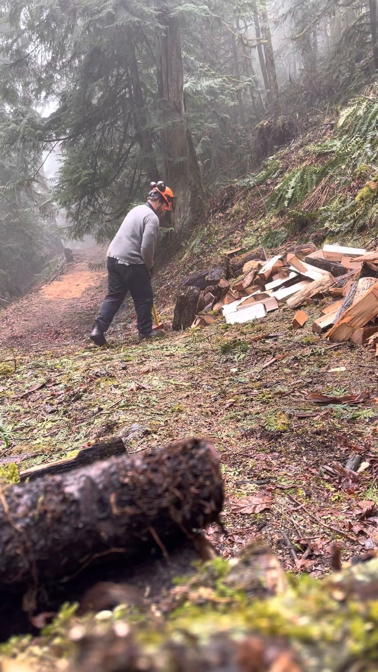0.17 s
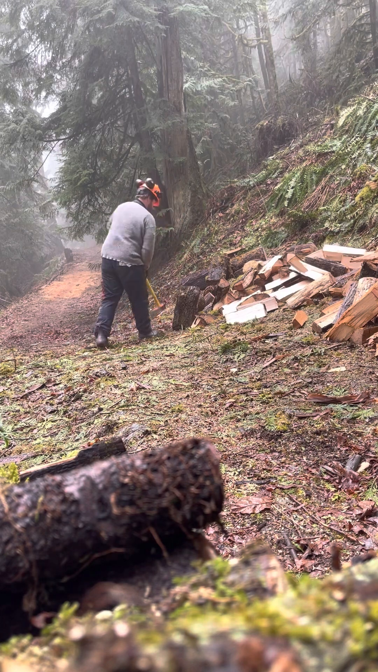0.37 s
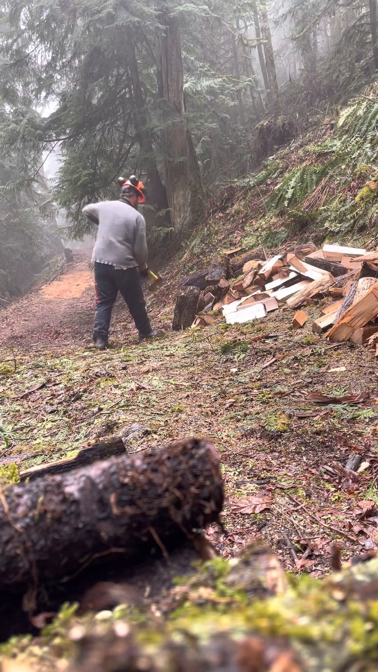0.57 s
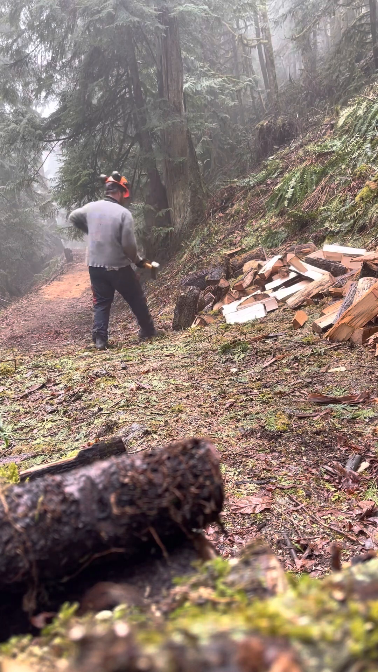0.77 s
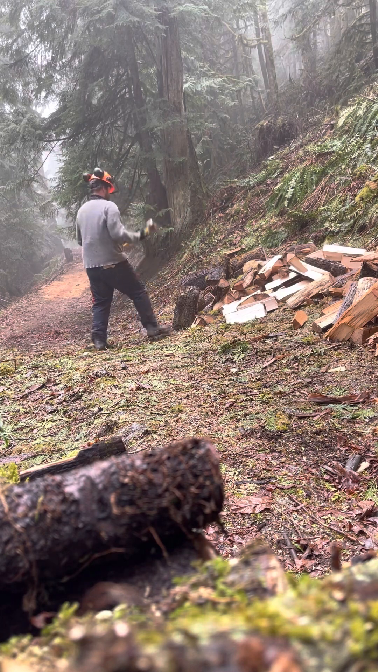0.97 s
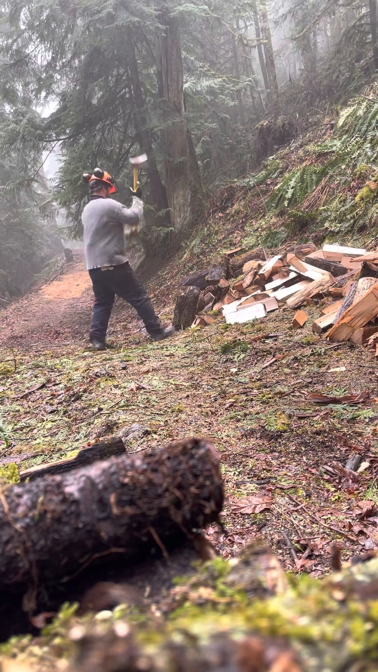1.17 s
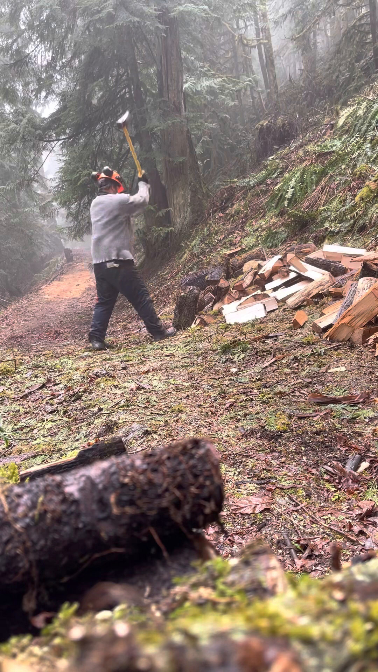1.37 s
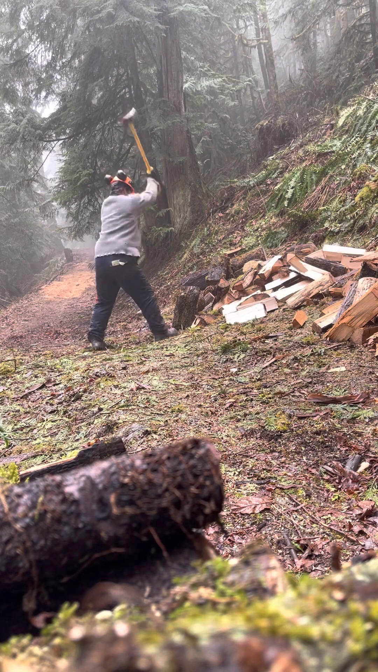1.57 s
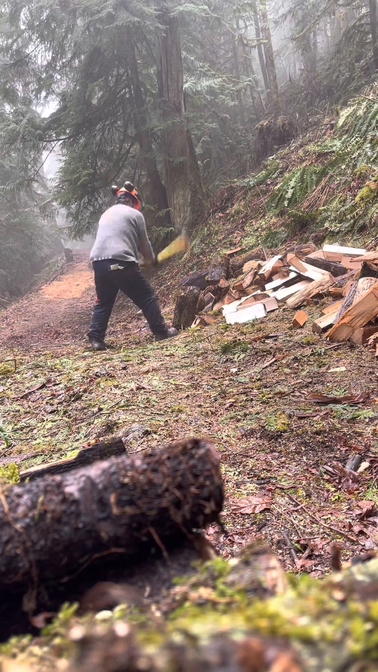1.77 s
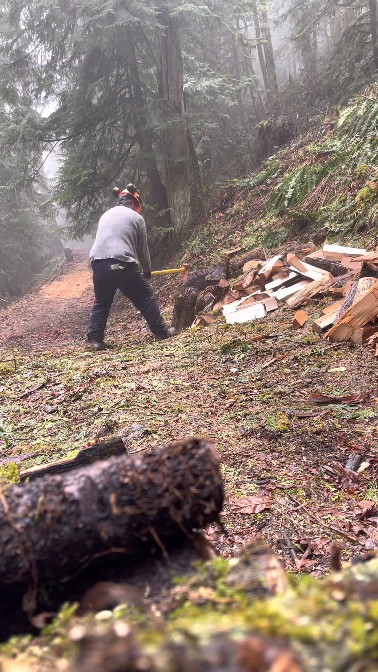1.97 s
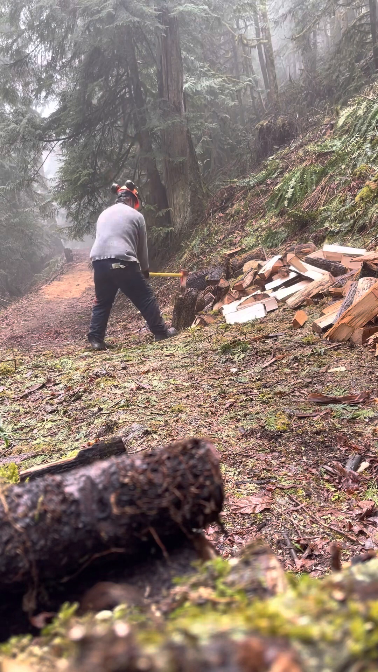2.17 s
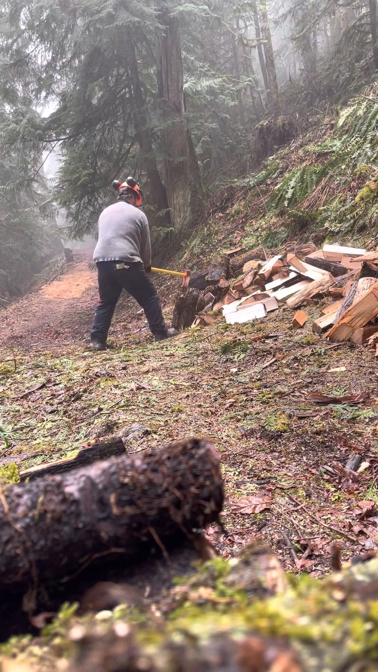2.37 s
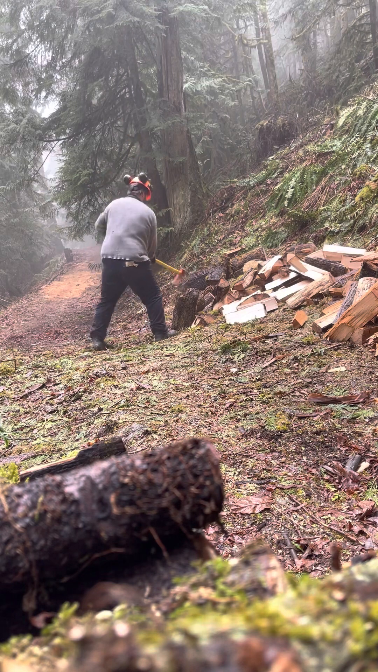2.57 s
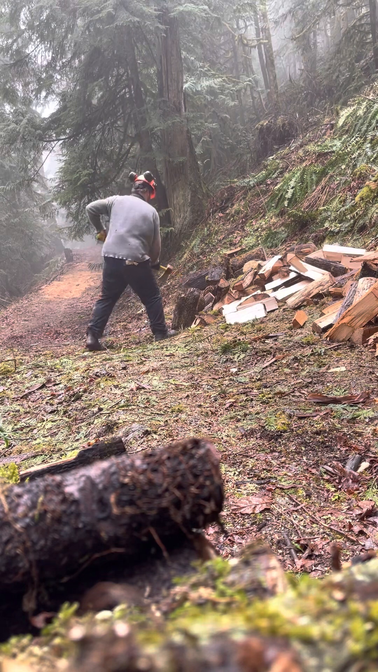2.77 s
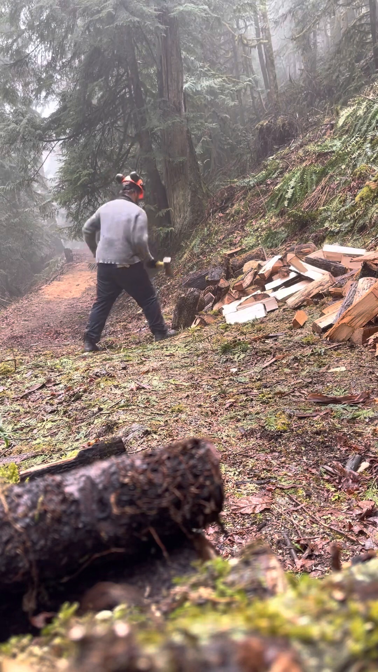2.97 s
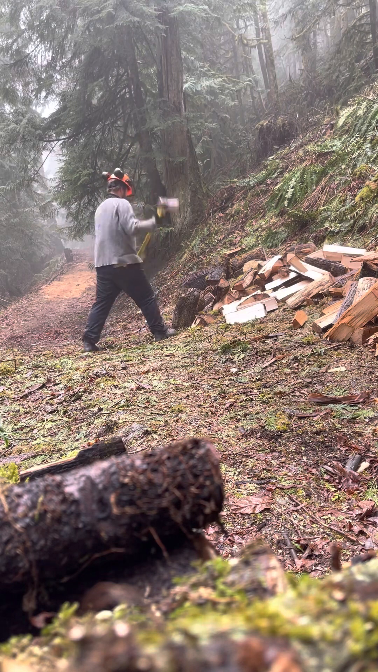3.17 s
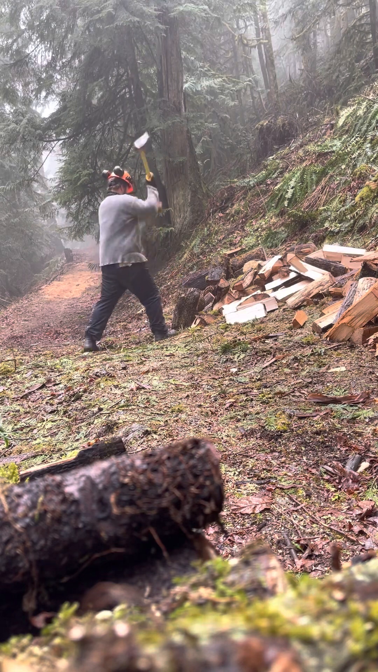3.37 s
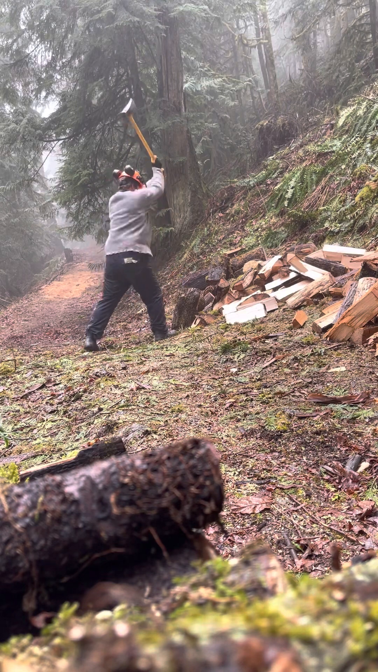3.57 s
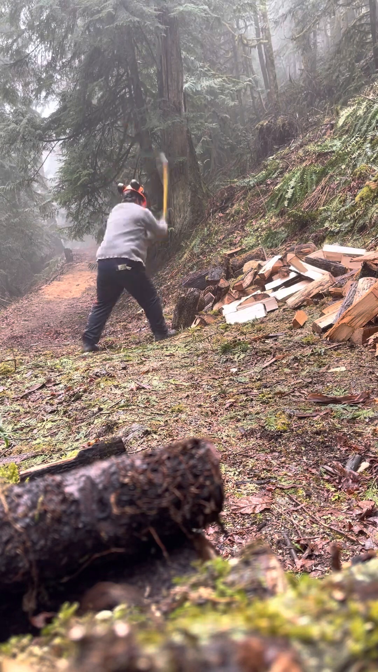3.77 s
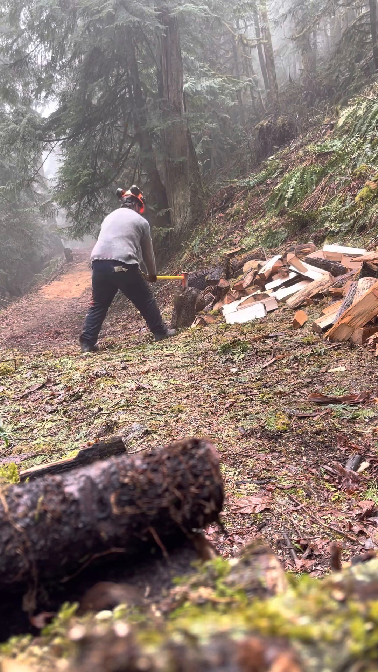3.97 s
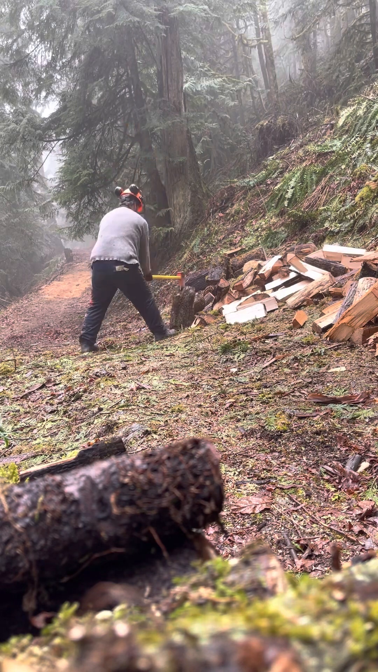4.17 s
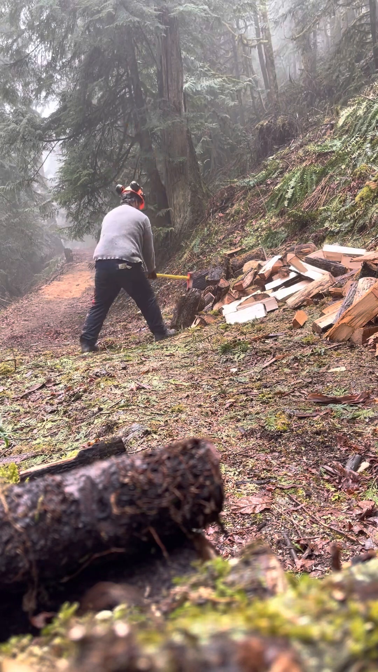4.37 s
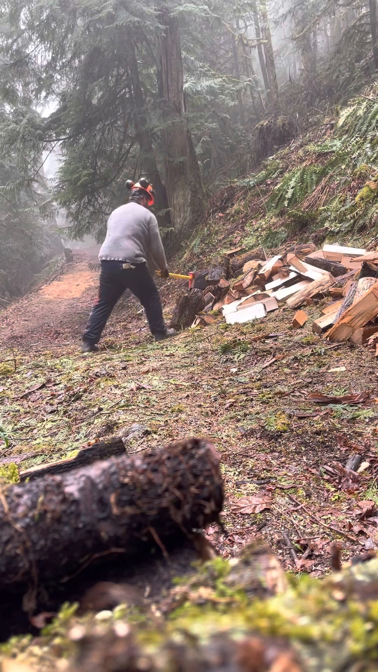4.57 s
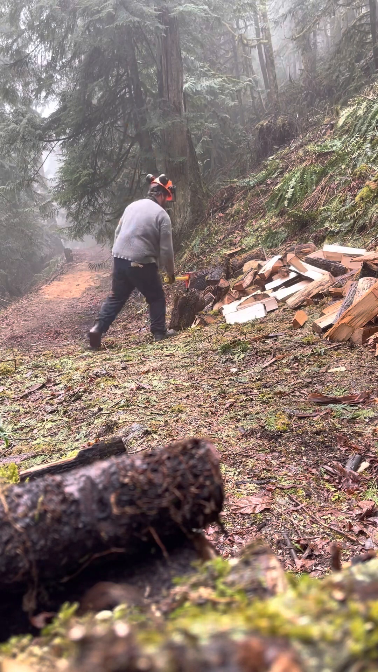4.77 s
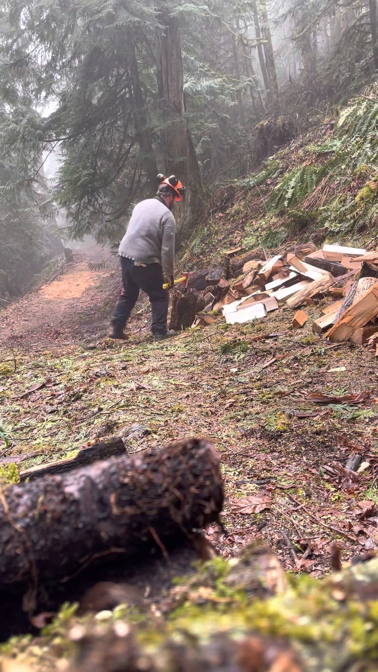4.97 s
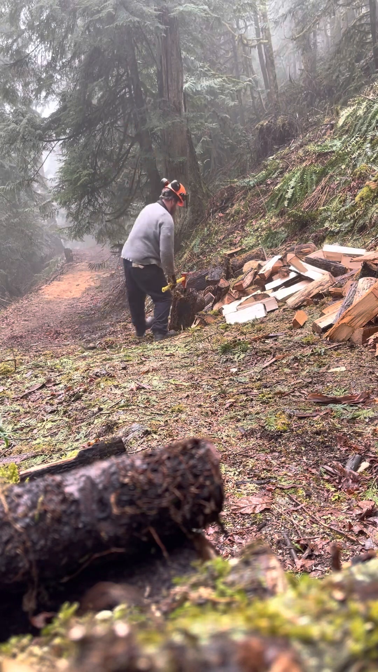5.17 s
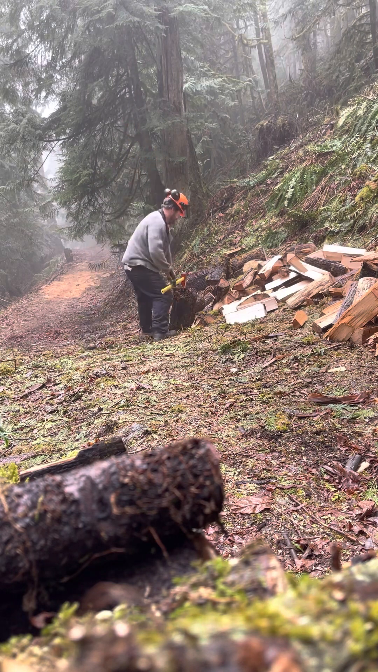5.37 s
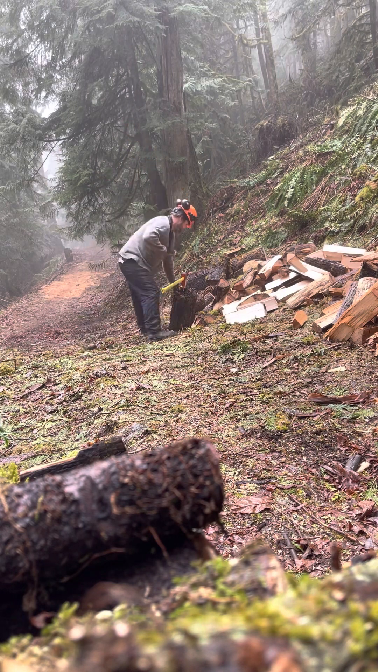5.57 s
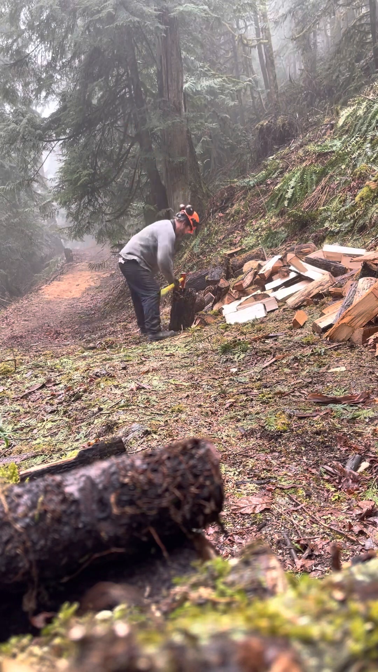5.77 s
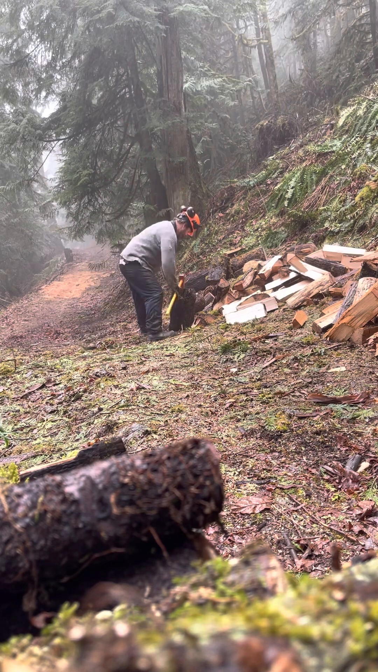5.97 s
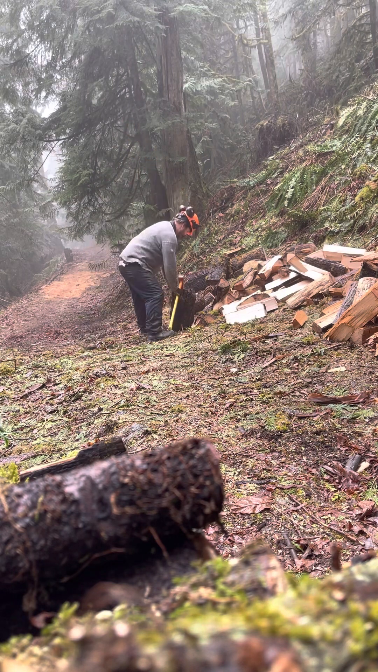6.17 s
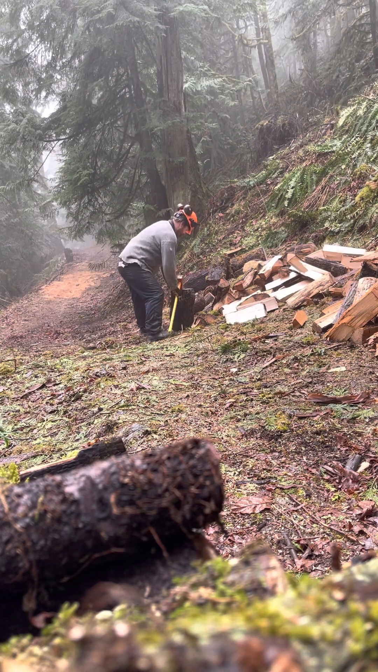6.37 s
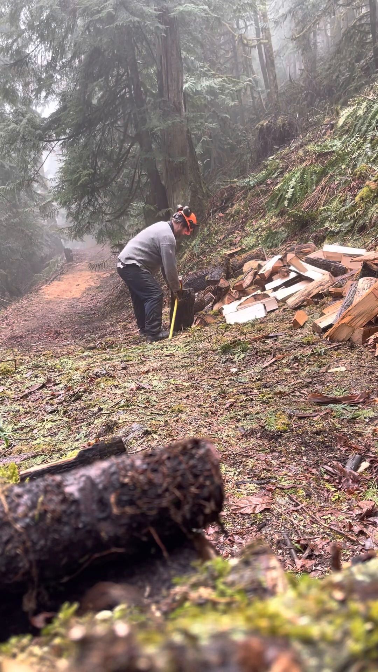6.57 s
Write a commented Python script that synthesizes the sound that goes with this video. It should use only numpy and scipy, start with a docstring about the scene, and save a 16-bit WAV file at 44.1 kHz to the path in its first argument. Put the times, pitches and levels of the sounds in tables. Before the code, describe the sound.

An axe splits wood outdoors with two sharp, booming strikes two seconds apart, each scattering woody echoes, followed by small clacks and scuffs.

```python
"""Two axe blows crack and thump into a round of firewood and scatter back from the trees.
The place is a still forest, with a pair of microphone ports on the ground some metres from the block.
Filtered noise makes the cracks, splinters, cloth and litter; damped sines make the ringing wood and thuds.
Sleeves swish as the axe is lifted, boots scuff the litter, and at the end the wood is knocked and shifted.
Random echo taps make the forest's answer, and a steady noise from all around makes the quiet air."""
import sys
import numpy as np
from scipy import signal
from scipy.fft import rfft, irfft
from scipy.io import wavfile
from scipy.ndimage import uniform_filter1d

SR = 44100
rng = np.random.default_rng(int(sys.argv[2]) if len(sys.argv) > 2 else 0)


def waveform_to_disk(signal):
    """Save audio, clipped to [-1, 1], as 16-bit WAV at the path in sys.argv[1]."""
    frames = np.transpose(np.atleast_2d(signal))
    scaled = np.clip(frames, -1, 1) * 32767
    samples = np.round(scaled).astype(np.int16)
    wavfile.write(sys.argv[1], SR, samples)


N = 292383
HZ = np.fft.rfftfreq(N, 1 / SR)
TIME = np.arange(N) / SR
SHORT = TIME[:16384]  # time axis of one short sound

# the axe blows and the forest's answer to each: start_s, ring_db, pitch_factor, boom_db, boom_t60_s,
# crack_db, tearing_fibres_db, forest_db, forest_treble_db
AXE_BLOWS = [(1.8382, -9, .95, -17, 0.078, -11, -28, -20.5, 1.5),
             (3.9287, -7.5, 1.02, -9.5, 0.079, -19.5, -39.5, -20, -11.5)]
# spectrum of small wood snapping, before any tilt: frequency_hz, relative_density_db_per_hz
SNAP_SPECTRUM = [(500, -6), (1500, 1), (3500, 1), (6000, -11.5), (8500, -8), (11000, -2), (12500, -9.5),
                 (14000, -49), (16000, -42)]


def amp(db):
    """Decibels to gain."""
    return 10 ** (np.asarray(db) / 20)


def evened(x):
    """Scales to rms 1."""
    return x / np.sqrt(np.mean(x ** 2) + 1e-20)


def read(points, hz):
    """Reads a table on a log-frequency axis."""
    f, value = np.transpose(points)
    return np.interp(np.log(hz + 1), np.log(f), value)


def add(mix, s, sound):
    """Mixes a sound in at time s."""
    part = mix[round(s * SR):][:len(sound)]
    part += sound[:len(part)]


def noise(spectrum, size, tilt_db=0):
    """Noise of rms 1 with a spectrum, tilted in dB per octave and rolled off under its lowest point."""
    hz = np.fft.rfftfreq(size, 1 / SR)
    octaves = np.log2(np.maximum(hz, 500) / 1000)  # the tilt stops below 500 Hz
    colour = amp(read(spectrum, hz) + tilt_db * octaves)
    lowest = spectrum[0][0]
    low_cut = hz ** 2 / (hz ** 2 + lowest ** 2 / 2)
    return evened(irfft(rfft(rng.standard_normal(size)) * colour * low_cut, size))


def decay(t60):
    """An exponential fade that loses 60 dB in t60 seconds."""
    return np.exp(-np.log(1000) * SHORT / t60)


def burst(spectrum, rise, t60, tilt_db=0):
    """A short spray of tiny fractures: noise that swells and dies (rise and t60 in s)."""
    fade = decay(t60) * (1 - np.exp(-SHORT / rise))
    return noise(spectrum, len(SHORT), tilt_db) * fade / fade.max()


def mode(hz, t60, swell):
    """A damped mode that swells over its first cycles."""
    cycles = SHORT * hz
    fade = decay(t60) * (1 - np.exp(-(cycles / swell) ** 2))
    return np.sin(2 * np.pi * cycles) * fade / fade.max()


def grain(size, depth_db):
    """The uneven grip of two surfaces rubbing, as a gain that changes every few milliseconds."""
    return amp(depth_db * evened(uniform_filter1d(rng.standard_normal(size), size=150)))


def axe():
    """The head rushes down, the edge bites, the round cracks, rings and booms, fibres tear and chips fly."""
    # modes of the round on its block, before each blow's pitch factor: frequency_hz, relative_level_db, t60_s
    round_modes = [(268.4, -12.5, .05), (339.7, -10, 0.042), (440, -10.5, 0.056), (608, -0.5, .036),
                   (740, -12.5, .045), (942, -7, 0.041), (1148, -16.5, 0.01), (1515, -16.5, .022)]
    # steel biting into wood, before any tilt: frequency_hz, relative_density_db_per_hz
    crack_spectrum = [(500, -7), (1650, -0.5), (2300, -12), (3000, -0.5), (3750, 4), (4700, -7.5),
                      (5400, -6), (6400, -15.5), (7700, -7), (8700, -9), (10700, 5.5), (12200, -8),
                      (13500, -27), (16000, -34)]
    # the split running on through the round in jerks: delay_after_blow_s, level_relative_to_crack_db
    split_jerks = [(.0042, -9), (.0167, -17)]
    # air around the falling head: frequency_hz, relative_density_db_per_hz
    rush_spectrum = [(120, -5.5), (450, -1), (700, -2), (1200, -18), (3000, -37)]
    swing_s, swing_db = .047, -55.5
    chip_flight_s = .07  # the first chips come down at least this long after a blow

    out = np.zeros(N)
    size = int(swing_s * SR)
    for s, ring_db, pitch, boom_db, boom_t60, crack_db, tear_db, _, _ in AXE_BLOWS:
        rush = noise(rush_spectrum, size) * np.linspace(0, 1, size) ** 2
        add(out, s - swing_s, amp(swing_db) * rush)
        # first bite through the surface
        bite = burst(crack_spectrum, rise=.001, t60=0.0092, tilt_db=3.5)
        add(out, s - .001, amp(crack_db - 14.5) * bite)
        crack = burst(crack_spectrum, rise=.0005, t60=.015, tilt_db=0.5)
        add(out, s + .001, amp(crack_db) * crack)
        for delay, db in split_jerks:
            jerk = burst(crack_spectrum, rise=.0003, t60=.018, tilt_db=2.0)
            add(out, s + delay, amp(crack_db + db) * jerk)
        tearing = burst(crack_spectrum, rise=0.0043, t60=.11, tilt_db=-1.0)
        add(out, s + .001, amp(tear_db - 4.0) * tearing)
        chips = splinters(per_s=110, t60=1.0, uneven_db=5)
        add(out, s + chip_flight_s, amp(tear_db - 26.5) * chips)
        add(out, s + 0.0007, amp(boom_db) * boom(boom_t60, start_hz=499, glide=0.0047, swell=0.0063))
        for hz, db, t60 in round_modes:
            add(out, s, amp(ring_db + db) * mode(hz * pitch, t60, swell=2.0))
    return out


def boom(t60, start_hz, glide, swell):
    """The soft ground holds back the low part of a blow, so it arrives as a falling boom (times in s)."""
    # the pitch falls as start_hz / (1 + t / glide)
    cycles = start_hz * glide * np.log(1 + SHORT / glide)
    fade = decay(t60) * (1 - np.exp(-(SHORT / swell) ** 2))
    return np.sin(2 * np.pi * cycles) * fade / fade.max()


def splinters(per_s, t60, uneven_db):
    """Chips fly off a split and patter down, most tiny, a few sharp, weaker as time goes on."""
    unevenness = np.minimum(rng.exponential(1, len(SHORT)), 3)
    sizes = amp(uneven_db * unevenness - 60 * SHORT / t60)
    chips = sizes * (rng.random(len(SHORT)) < per_s / SR)
    return signal.fftconvolve(chips, burst(SNAP_SPECTRUM, rise=.0002, t60=0.0087))


def knocks():
    """Wood knocks on wood: a spray of contact noise and the damped modes of a split billet."""
    # the knocks, each mode's pitch varying a little at random: start_s, level_db, pitch_factor
    knock_events = [(5.7660, -38.5, 1.02), (5.7700, -37.5, 0.93), (5.781, -37.5, 1.02), (6.1005, -58, 1.0),
                    (6.1165, -48, 0.94), (6.4276, -54.5, 0.59)]
    # modes of a split billet, before the pitch factor: frequency_hz, relative_level_db, t60_s
    billet_modes = [(407, -11, 0.058), (684, -3.5, 0.032), (930, -1, 0.066), (1467, 0, 0.03),
                    (1870, -4.5, 0.034), (2960, -6.5, 0.032)]
    out = np.zeros(N)
    for s, db, pitch in knock_events:
        contact = burst(SNAP_SPECTRUM, rise=0.00037, t60=0.0383, tilt_db=4.5)
        add(out, s, amp(db - 8.5) * contact)
        for hz, mode_db, t60 in billet_modes:
            ring = mode(hz * pitch * rng.uniform(0.93, 1.04), t60, swell=1.0)
            add(out, s, amp(db + mode_db - 3) * ring)
    return out


def snaps():
    """Splinters and twigs snap, each a very short burst of fractures."""
    # start_s, level_db, brightness_db_per_octave
    snap_events = [(.8541, -59.5, 9.5), (2.0024, -45, 0), (2.0713, -50, -2), (2.0913, -49.5, 12),
                   (2.1697, -58, -4), (2.5244, -59.5, -3.5), (4.2333, -61, 14), (4.6583, -62, 1.5),
                   (4.7285, -63.5, 5), (5.4705, -60, 10), (5.5108, -61.5, 4), (5.7907, -31.5, 5),
                   (6.1164, -44.5, 3)]
    out = np.zeros(N)
    for s, db, tilt_db in snap_events:
        add(out, s, amp(db) * burst(SNAP_SPECTRUM, rise=0.0005, t60=0.01382, tilt_db=tilt_db))
    return out


def landings():
    """Wood and boots land on soft ground: a slap, the full weight, then earth and litter settling. The row at
    1.857 s is not a landing but a deep thump under the first axe blow."""
    # start_s, level_db, pitch_hz of the full weight
    landing_events = [(.843, -56, 70.4), (1.857, -32.5, 54.5), (2.097, -35.5, 200), (3.975, -28, 192),
                      (4.018, -43, 83), (4.105, -47.5, 120), (4.232, -52, 130), (5.268, -50, 135),
                      (5.32, -54, 69), (5.772, -45, 171), (5.799, -39.5, 119.6), (5.831, -43, 151)]
    # earth and litter settling under a weight: frequency_hz, relative_density_db_per_hz
    soil_spectrum = [(45, -3), (110, 0), (300, -4), (600, -16), (1500, -40), (4000, -70)]
    soil_db, soil_t60 = -13, .17  # level relative to the thud; seconds
    # first contact: higher, weaker and just ahead (s) of the full weight
    slap_ratio, slap_db, slap_lead_s = 2.1, -4, .004
    out = np.zeros(N)
    for s, db, hz in landing_events:
        add(out, s - slap_lead_s, amp(db + slap_db) * thud(hz * slap_ratio))
        add(out, s, amp(db) * thud(hz))
        add(out, s, amp(db + soil_db) * burst(soil_spectrum, rise=.004, t60=soil_t60))
    return out


def thud(hz):
    """A few cycles of a weight pressing into soft ground; lower thuds last longer."""
    damping_cycles = 9  # the ground damps every thud by 60 dB in this many cycles
    return mode(hz, damping_cycles / hz, swell=0.94)


def sleeves():
    """Cloth swishes while the axe is lifted: grainy noise that follows the speed of the arms."""
    # the lifts: start_s, length_s, level_db
    lift_events = [(1.10, .43, -71), (3.233, .41, -71)]
    # sliding cloth: frequency_hz, relative_density_db_per_hz
    cloth_spectrum = [(600, -9), (1600, 1), (2300, -5.5), (3400, -2), (6000, -11), (8500, -2.5),
                      (11000, -4), (13000, -23), (15000, -36)]
    rise_s, fall_s, grain_db = 0.058, .15, 1.33
    out = np.zeros(N)
    for s, length, db in lift_events:
        t = TIME[:int(length * SR)]
        speed = np.minimum(t / rise_s, 1) * np.minimum((length - t) / fall_s, 1)
        swish = noise(cloth_spectrum, len(t)) * grain(len(t), depth_db=grain_db)
        add(out, s, amp(db) * speed * swish)
    return out


def scuffs():
    """Boots and bark scuff the forest floor: grainy noise fading in and out."""
    # start_s, length_s, level_db, brightness_db_per_octave
    scuff_events = [(0.398, 0.674, -78.5, 0), (0.744, 0.082, -75, 26), (2.42, 0.84, -75, 2),
                    (2.879, 0.13, -68, -2), (3.77, 0.1257, -73.5, 2.5), (4.594, 0.199, -72.5, -3),
                    (5.219, 0.4, -64.5, -3), (5.772, 0.089, -58, 3), (6.05, 0.2, -68, 2.5),
                    (6.43, 0.0667, -66, 7)]
    # rubbed litter, before the tilt: frequency_hz, relative_density_db_per_hz
    litter_spectrum = [(250, -4), (600, -2), (1100, -2.5), (1600, 1.5), (2300, -14), (3200, -7),
                       (6000, -26.5), (8500, -13.5), (11000, -11.5), (13500, -35), (16000, -54)]
    out = np.zeros(N)
    for s, length, db, tilt_db in scuff_events:
        size = int(length * SR)
        rub = evened(noise(litter_spectrum, size, tilt_db) * grain(size, depth_db=2.5))
        add(out, s, amp(db) * rub * signal.windows.tukey(size, .8))
    return out


def scrapes():
    """The axe slides along the wood: a smooth hiss of steel on fibres."""
    # start_s, length_s, level_db
    scrape_events = [(6.115, 0.1, -68.5), (6.418, 0.0757, -82)]
    # steel sliding on wood: frequency_hz, relative_density_db_per_hz
    scrape_spectrum = [(1000, -19.5), (2400, -11), (3050, 12), (3700, -9), (4600, -9), (6000, -22),
                       (9000, -8.5), (12000, -13), (14000, -43)]
    out = np.zeros(N)
    for s, length, db in scrape_events:
        size = int(length * SR)
        add(out, s, amp(db) * noise(scrape_spectrum, size) * signal.windows.tukey(size, .7))
    return out


def forest(treble_db, near_db=10.0, near_t60=0.35, far_db=-4.5, far_s=0.3, far_width=0.19, patchy_db=2.0):
    """Answer to one crack: echoes from bank and woodpile close by, then a swell from trunks farther off."""
    # colour of the trees' answer, before the treble shelf: frequency_hz, relative_level_db
    forest_colour = [(25, 0), (55, 15), (120, 6.5), (220, 0), (380, -3.5), (620, 4.5), (850, 2),
                     (1300, -4.5), (2300, -11), (3500, -8), (5300, -8), (6600, -12.5), (8300, -6.5),
                     (11000, -4.5), (13500, -29), (15000, -52)]
    # decay by frequency, on top of the near and far envelopes: frequency_hz, t60_s
    forest_decay = [(60, 1.1), (300, 0.87), (700, 1.15), (2000, 1.05), (4000, .85), (8000, 0.58),
                    (12000, .45)]
    t = TIME[:int(1.5 * SR)]
    taps = rng.standard_normal(len(t)) * (rng.random(len(t)) < 9000 / SR)  # 9000 echoes a second
    taps *= amp(patchy_db * evened(uniform_filter1d(rng.standard_normal(len(t)), size=300)))
    near = amp(near_db - 60 * t / near_t60)
    far = amp(far_db) * np.exp(-((t - far_s) / far_width) ** 2)
    onset = np.clip((t - .012) / .025, 0, 1)  # silent for the first 12 ms
    taps = evened(taps) * onset * (1 + near + far)
    hz, when, z = signal.stft(taps, SR, nperseg=512)
    colour_db = read(forest_colour, hz) + treble_db * hz ** 4 / (hz ** 4 + 2000 ** 4)
    z *= amp(colour_db[:, None] - 60 * when / read(forest_decay, hz)[:, None])
    return signal.istft(z, SR, nperseg=512)[1] / 4


def echoes(small, small_db, small_treble_db):
    """The forest throws back each blow, and faintly, with lifted treble, the small sounds."""
    out = amp(small_db) * signal.fftconvolve(small, forest(small_treble_db))[:N]
    for s, *_, forest_db, treble_db in AXE_BLOWS:
        add(out, s, amp(forest_db) * forest(treble_db))
    return out


def air():
    """The quiet air of the forest: steady coloured noise arriving mostly from all around."""
    # frequency_hz, relative_density_db_per_hz
    air_spectrum = [(25, -28.5), (48, -5.5), (80, 1), (200, -15), (380, -19), (620, -18.5), (1100, -26.5),
                    (1600, -29), (2300, -37), (6000, -45), (8500, -43.5), (11400, -39), (13000, -60),
                    (16000, -75.5)]
    air_db = -62.5
    return amp(air_db) * ports(noise(air_spectrum, N), noise(air_spectrum, N), spread=0.79)


def ports(x, stray, spread):
    """Sound at the two microphone ports; the share that comes from all around grows with frequency."""
    # phase by which the left port leads: frequency_hz, lead_rad
    port_lead = [(100, 0), (500, .5), (720, 1), (1000, 4), (1400, 4.5), (2000, 8), (2800, 7), (3600, 6.5),
                 (5500, 7.5), (7000, 7), (8500, 7.5), (9800, 3), (10900, 4.5), (12500, -4)]
    # level of the left port over the right: frequency_hz, left_minus_right_db
    port_lean = [(150, 0), (600, -2.5), (1000, 1.5), (1400, -1.5), (2800, 6), (3600, 4), (5000, 2.5),
                 (7000, 2), (10000, 0)]
    share = np.clip(spread, 0, 1) * (HZ ** 2 + 110 ** 2) / (HZ ** 2 + 700 ** 2)
    common = rfft(x) * np.sqrt(1 - share / 2)
    opposed = rfft(stray) * np.sqrt(share / 2)
    half = amp(read(port_lean, HZ) / 2)
    lead = np.exp(1j * read(port_lead, HZ))
    left = (common + opposed) * half
    right = (common - opposed) / half / lead
    return irfft(np.array([left, right]) / np.sqrt((half ** 2 + half ** -2) / 2), N)


def scene():
    """The work at the block, its echoes and the quiet air."""
    small = knocks() + snaps() + landings() + sleeves() + scuffs() + scrapes()
    trees = [echoes(small, small_db=-46, small_treble_db=10.5) for _ in range(2)]
    direct = ports(axe() + small, np.zeros(N), spread=0)
    return direct + ports(*trees, spread=0.77) + air()


def record(dry):
    """The recorder's band limit: a linear-phase low-pass filter."""
    edge_hz = 16500
    low_pass = signal.firwin(511, edge_hz, window=("kaiser", 9), fs=SR)
    return signal.oaconvolve(dry, low_pass[None], "same")


dry = scene()
out = record(dry)
waveform_to_disk(out)
```